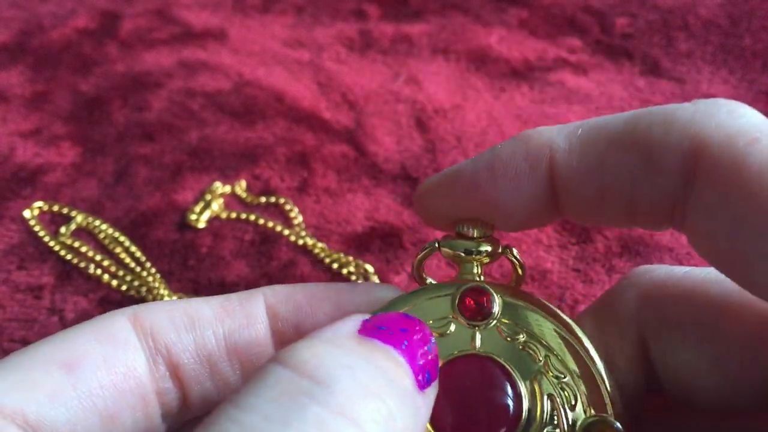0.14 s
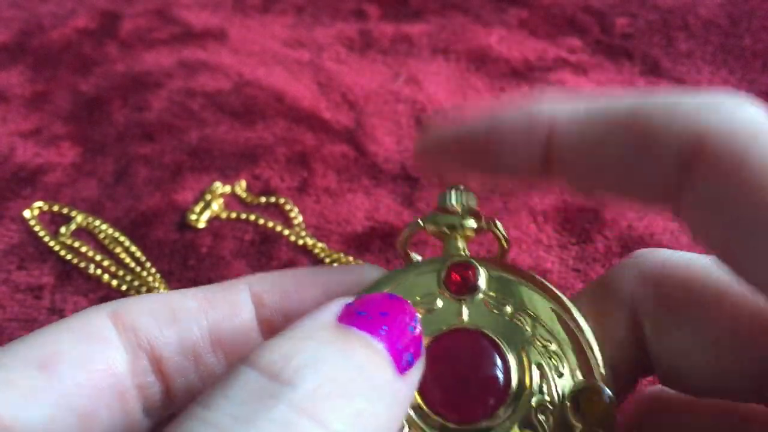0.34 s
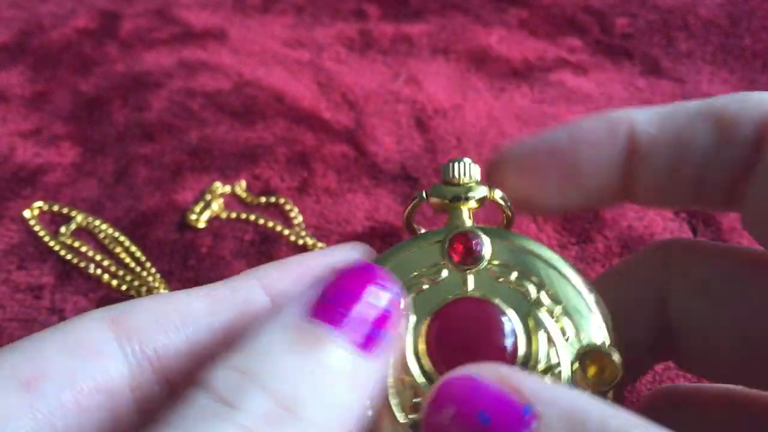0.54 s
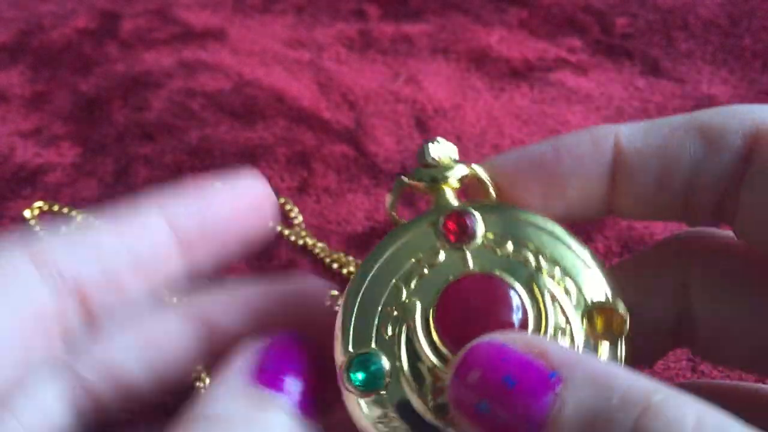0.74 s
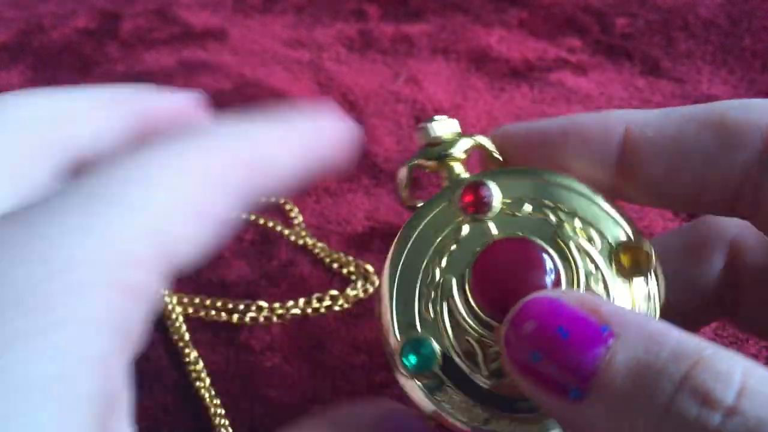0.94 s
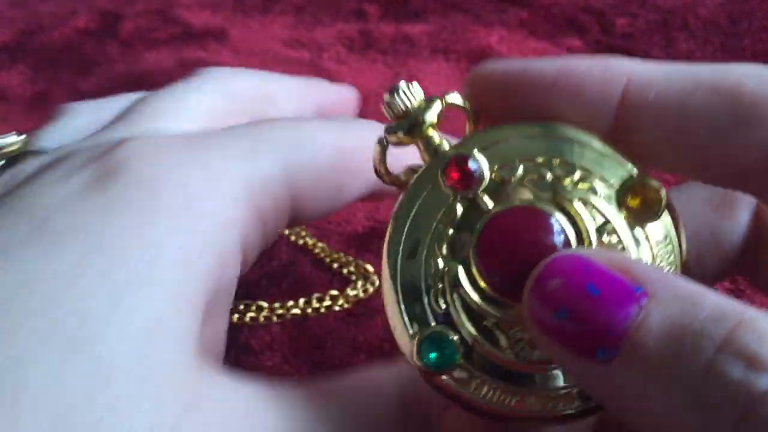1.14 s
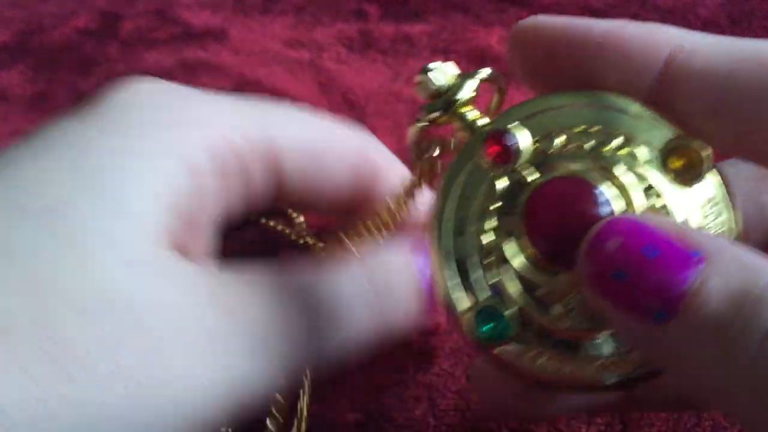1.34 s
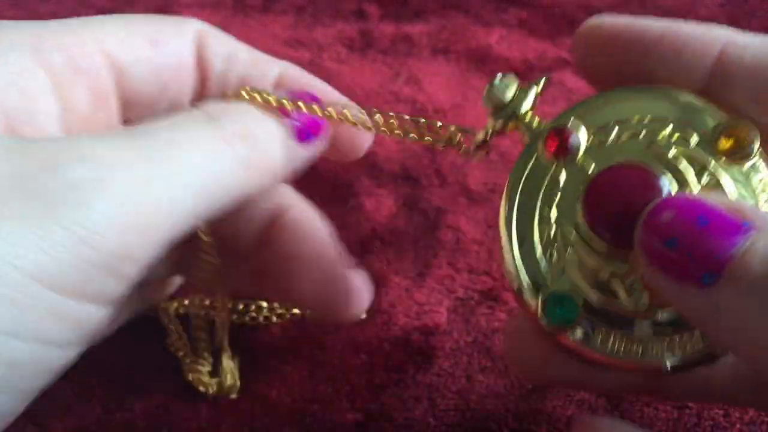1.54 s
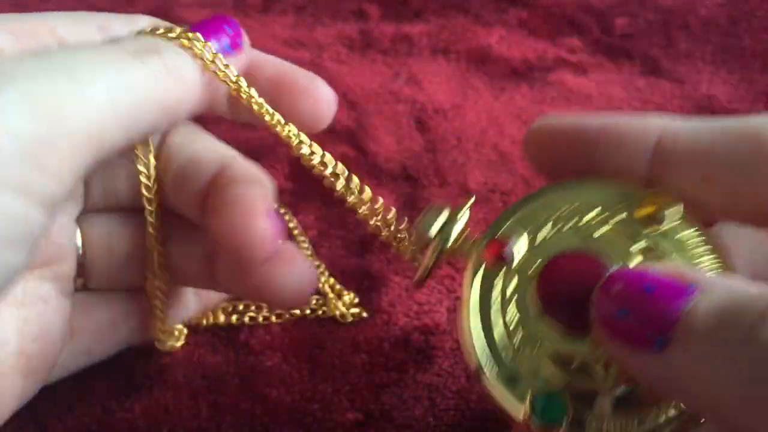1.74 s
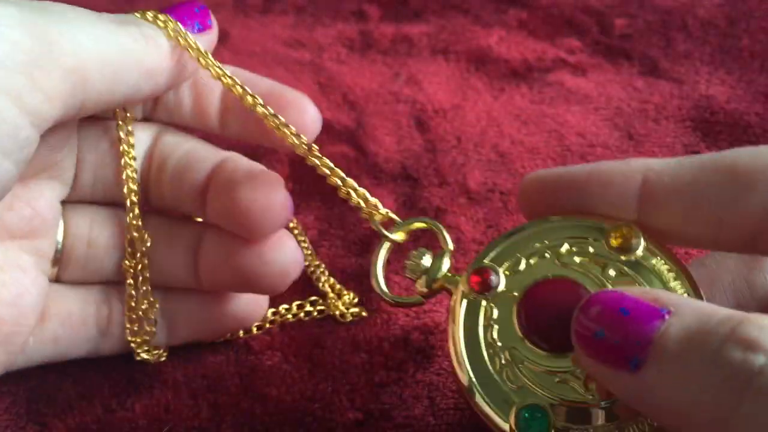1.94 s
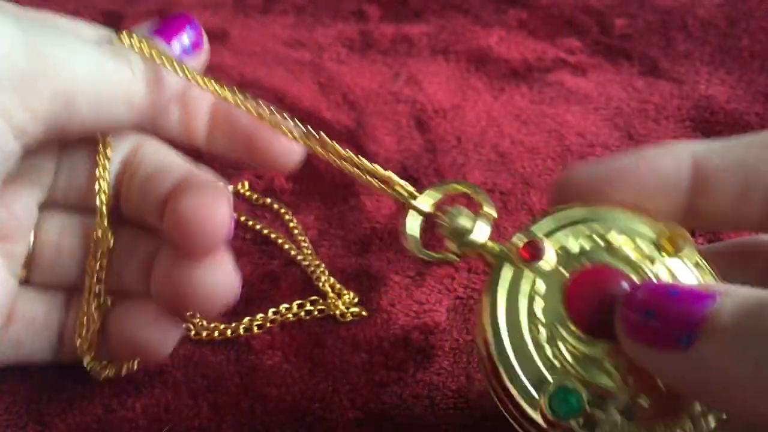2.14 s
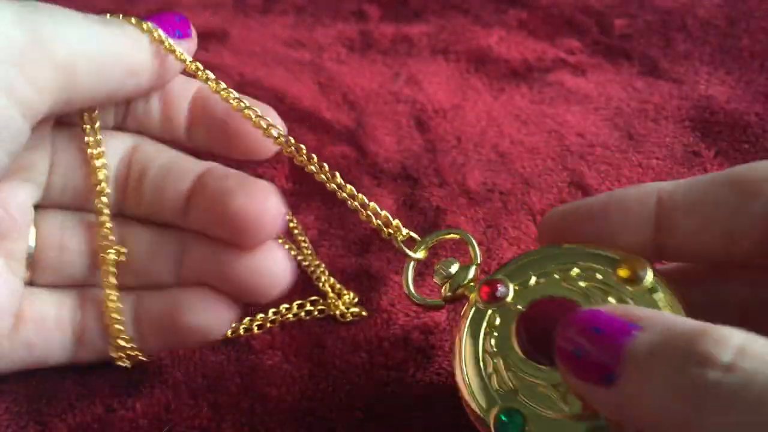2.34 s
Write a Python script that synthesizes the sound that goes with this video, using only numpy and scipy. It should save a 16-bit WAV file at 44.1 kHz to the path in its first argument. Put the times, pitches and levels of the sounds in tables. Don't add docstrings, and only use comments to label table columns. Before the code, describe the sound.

Pocket watch latch snaps sharply, then its metal bow clacks on the case amid faint chain ticks

```python
import sys
import numpy as np
from scipy import signal
from scipy.fft import rfft, irfft, next_fast_len
from scipy.io import wavfile
from scipy.ndimage import uniform_filter1d

SR = 44100
rng = np.random.default_rng(int(sys.argv[2]) if len(sys.argv) > 2 else 0)


def master(y):
    cut = np.clip(np.atleast_2d(y).T, -1, 1)
    pcm = np.round(cut * 32767)
    wavfile.write(sys.argv[1], SR, pcm.astype(np.int16))


def how_loud(loudness_db):
    steps = np.asarray(loudness_db, float) / 20
    return 10 ** steps


N = 105840


def unit(x):
    return x / np.sqrt(np.mean(x ** 2) + 1e-20)


def along(points, hz):
    f, value = np.transpose(points)
    return np.interp(np.log(hz + 1), np.log(f + 1), value)


def filtered(x, response):
    size = next_fast_len(N + 8192)
    spectrum = rfft(x, size) * response(np.fft.rfftfreq(size, 1 / SR))
    return irfft(spectrum, size)[:N]


def noise(response):
    return unit(filtered(rng.standard_normal(N), response))


def closed(points):
    return lambda hz: how_loud(along(points, hz)) * (hz >= points[0][0]) * (hz <= points[-1][0])


def cut(x, hz, kind):
    return signal.sosfilt(signal.butter(6, min(hz, SR / 2.1), kind, fs=SR, output="sos"), x)


def add(track, s, x):
    part = track[round(s * SR):][:len(x)]
    part += x[:len(part)]


def ring(modes, weight_db):
    rise_s, crack_db, crack_t60 = 0.00032, -7, 0.0039
    hz, db, t60 = np.transpose(modes)[:, :, None]
    t = np.arange(SR // 25) / SR
    envelopes = how_loud(db + np.reshape(weight_db, (-1, 1)) - 60 * t / t60)
    tones = envelopes * np.sin(2 * np.pi * hz * t)
    crack = how_loud(crack_db + np.mean(weight_db) - 60 * t / crack_t60) * rng.standard_normal(len(t))
    signs = (-1.) ** np.arange(len(modes))
    return (signs @ tones + crack) * (1 - np.exp(-t / rise_s))


def latch():
    # f/Hz, level/dB, t60/s
    latch_modes = [(647, -8.5, 0.0053), (915, -9.5, 0.0099), (1231, -19.5, 0.0094), (2010, -3, 0.011),
                   (2525, -18.5, 0.02), (3403, -3, .009), (4140, -0.5, 0.00713), (5550, 1, 0.0047),
                   (7220, 2.5, 0.0031), (8500, -6, 0.0043), (9800, -3, .0032), (11500, -24, .005),
                   (12950, -7.5, 0.0071), (14470, -6, .006),
                   (6515, -7, 0.003877), (13740, -11, .005), (15810, -32, .005)]
    # t/s, level/dB
    snaps = [
        (0.2126, -10.5),
        (0.235, -62.5),
    ]
    low_hz, top_hz = 309.4, 15234
    out = np.zeros(N)
    for s, db in snaps:
        add(out, s, how_loud(db) * ring(sorted(latch_modes), 0))
    out = cut(out, low_hz, "high")
    return cut(cut(out, top_hz, "low"), top_hz, "low")


def bow():
    # f/Hz, level/dB, t60/s
    case_modes = [(1295.3, -15, .007), (1842.7, -17, 0.016), (2395.5, -5, 0.01448), (2966, -23.5, 0.0069),
                  (4578, 0, 0.0076), (5120, -23.5, 0.02), (5400, -11.5, 0.012), (6920, -11.5, 0.0056),
                  (8010, -15, .005), (9100, -6, 0.0045), (11770, -3, 0.0047), (12900, -8, 0.0084),
                  (13500, -14.5, 0.0091), (15480, -18.5, 0.0087)]
    # t/s, level/dB, brightness/(dB per octave)
    contacts = [(.2170, -50, -7), (.2190, -50.5, 7), (0.22, -45.5, 2), (.6898, -49, 1), (.6939, -40, 4),
                (0.6953, -18.5, 3.5), (0.6964, -30, 3), (0.6972, -35, 1), (0.6987, -35, -0.5),
                (.7000, -50, 5), (.7016, -49, 3), (.7058, -40, 3), (.7064, -44, 1), (.7100, -57, 4),
                (.7133, -54, 6), (0.7161, -39, 2.5), (0.718, -53, 0.5), (0.7262, -58.5, 2),
                (0.7321, -62, -1)]
    scatter_db = 4
    out = np.zeros(N)
    octaves = np.log2(np.transpose(case_modes)[0] / 4500)
    for s, db, tilt_db in contacts:
        scatter = scatter_db * (db < -35) * rng.standard_normal(len(case_modes))
        add(out, s, how_loud(db) * ring(case_modes, tilt_db * octaves + scatter))
    return out


def touch(hz, others_db):
    # f/Hz, level/dB, t60/s
    loose_modes = [(1505, -7.5, .01), (2000, -3, .016), (2364, -3, 0.027), (3320, -6, .01),
                   (4420, -0.5, 0.018), (5120, -4, 0.022), (5480, -3.5, 0.015), (7000, -0.5, 0.0074),
                   (8600, -2.5, 0.019), (9650, -7, .01), (11770, -0.5, .014), (12900, 1, .014),
                   (14235, -5, .012), (15500, 0, 0.018)]
    favour_oct = 0.1
    damped_share, far_db_per_oct = 0.27, -3
    f, db, t60 = np.transpose(loose_modes)
    distance = np.abs(f - hz)
    f = np.where(distance == distance.min(), hz, f)
    octaves = np.abs(np.log2(f / hz))
    far = 1 - np.exp(-.5 * (octaves / favour_oct) ** 2)
    weight_db = others_db * far + far_db_per_oct * octaves + rng.normal(0, 1.608, len(f))
    return ring(np.transpose([f, db, t60 * damped_share ** far]), weight_db)


def ticks():
    # t/s, level/dB, favoured f/Hz, level of the other modes/dB
    link_hits = [(0.149, -67, 6100, -6), (.2005, -68, 12900, -9), (.2020, -56, 4630, -11),
                 (0.2075, -47, 4420, -26), (.2085, -56, 13300, -2), (0.219, -51, 15000, -4),
                 (.2200, -45, 10300, -4), (0.2206, -42, 14100, -12.5), (.2262, -50, 4000, 8),
                 (.2264, -65, 8750, -11.5), (0.232, -58, 8100, -10), (0.234, -55, 7000, -7.5),
                 (.2475, -58, 8500, -8), (0.3634, -53, 5520, -0.5), (0.3633, -58, 4015, -2.5),
                 (0.4656, -57, 2265, -13), (0.4773, -64, 2700, -11), (0.716, -47, 13700, -9.5),
                 (0.7183, -48, 5140, -16), (1.134, -64, 15300, -4), (1.1369, -59.5, 5120, -10),
                 (1.1372, -58, 12900, -3), (1.1364, -57.5, 11500, -1.5), (1.1498, -58, 12900, -3),
                 (1.1497, -66.5, 5120, -12), (1.245, -55, 4420, -14), (1.2451, -60.5, 2000, -2),
                 (1.502, -65, 7000, -5), (1.8328, -62.5, 15500, -5.5), (1.8353, -59.5, 11770, -5.5),
                 (1.8510, -63, 4420, -30.5), (1.902, -56, 7000, -6), (1.9025, -65, 15500, -6),
                 (1.912, -55, 4400, -17), (1.912, -60.5, 7000, -20), (1.9450, -72, 4420, -24),
                 (1.9632, -58, 7000, -9), (1.9628, -60, 12430, 0), (1.963, -65, 8440, -7),
                 (2.0880, -65, 13600, -9), (2.097, -58.5, 15500, -8.5), (2.0994, -55.5, 4420, -5),
                 (2.0995, -53.5, 12900, -3.5), (2.1005, -57.5, 2000, -4.5), (2.131, -66, 15500, -5)]
    chatter_s, chatter_db = 0.002, -20.5
    out = np.zeros(N)
    t = np.arange(SR // 100) / SR
    for s, db, hz, others_db in link_hits:
        chatter = how_loud(chatter_db) * rng.standard_normal(len(t)) * np.exp(-t / chatter_s)
        tick = np.convolve(np.r_[1, chatter], touch(hz, others_db))
        add(out, s, how_loud(db) * tick / np.abs(tick).max())
    return out


def scrapes():
    # t/s, length/s, level/dB, favoured f/Hz, level of the other modes/dB
    rubs = [(.128, .035, -75, 5120, -8), (.188, 0.021, -65, 2365, -6), (.226, .05, -67, 2030, -12),
            (.232, .08, -70, 8400, -1), (0.671, .02, -75, 7000, -2), (.72, 0.03, -71, 5150, -10),
            (.725, .03, -74, 2390, -10), (0.799, 0.1, -79, 2420, -16), (1.124, 0.03, -75, 13000, -2),
            (1.125, 0.036, -76, 5120, -20), (1.128, .03, -80, 9000, 0), (1.232, 0.028, -80, 4420, -18),
            (1.53, 0.06, -83, 4420, -18), (1.54, .06, -84, 1950, -14), (1.625, .035, -84, 4420, -18),
            (1.81, 0.06, -83, 4420, -18), (1.83, .012, -77, 14500, -2), (1.885, 0.056, -78, 2380, -16),
            (1.905, 0.035, -78, 5170, -20), (1.908, .02, -78, 7100, -12), (1.91, .045, -80, 4420, -18),
            (1.958, .014, -78, 9000, 0), (1.96, .028, -82, 4420, -18), (1.974, 0.02, -80, 2400, -14),
            (2.092, .014, -75, 14000, -1), (2.13, 0.03, -81, 15000, -5), (2.137, .035, -83, 5150, -16)]
    out = np.zeros(N)
    for s, length, db, hz, others_db in rubs:
        count = round(length * SR)
        grains = rng.standard_normal(count) * how_loud(3.45 * rng.exponential(size=count))
        drive = unit(grains) * np.hanning(count) ** .5
        rub = signal.fftconvolve(drive, touch(hz, others_db))
        add(out, s, how_loud(db) * rub / np.sqrt(np.mean(rub[:count] ** 2)))
    return out


def blurred(x):
    bins, share = 19, .93
    z = signal.stft(x, nperseg=256)[2]
    power = np.abs(z) ** 2
    spread = (1 - share) * power + share * np.abs(uniform_filter1d(power, size=bins, axis=0))
    y = signal.istft(z * np.sqrt(spread / (power + 1e-20)), nperseg=256)[1][:N]
    return y * np.linalg.norm(x) / np.linalg.norm(y)


def room(x):
    # f/Hz, t60/s
    decay = [(400, .22), (2000, 0.5), (8000, 0.42), (15000, 0.51)]
    # f/Hz, level/dB
    colour = [(700, 2.5), (1500, -6), (2100, -2.5), (4000, -7.5), (7500, -0.5), (11000, -2), (16000, -2.5)]
    level_db, gap_s = -32.5, .02
    hz, t, z = signal.stft(rng.standard_normal(SR // 2), SR, nperseg=256)
    decay_db = along(colour, hz)[:, None] - 60 * t / along(decay, hz)[:, None]
    tail = signal.istft(z * how_loud(decay_db), SR, nperseg=256)[1]
    tail *= 1 - np.exp(-(np.arange(len(tail)) / SR / gap_s) ** 2)
    return how_loud(level_db) * signal.fftconvolve(x, tail / np.linalg.norm(tail))[:N]


def motor():
    # t/s, f/Hz, level/dB
    course = [(0, 116.8, -64.5), (0.099, 118.4, -48), (0.239, 117.9, -64.5), (0.339, 117.4, -50),
              (0.499, 117.1, -48.5), (.62, 118.3, -60), (.72, 117.9, -52), (.95, 118.3, -52.5),
              (1.061, 119.4, -61.5), (1.239, 117.7, -51), (1.43, 117.6, -60), (1.619, 117.4, -53),
              (1.759, 116.4, -57), (1.98, 115.4, -54), (2.1, 117.6, -58), (2.4, 118.9, -55.5)]
    s, hz, db = np.transpose(course)
    t = np.arange(N) / SR
    phase = 2 * np.pi * np.cumsum(np.interp(t, s, hz)) / SR
    return np.sqrt(2) * how_loud(np.interp(t, s, db)) * np.sin(phase)


def hum():
    # f/Hz, wander width/Hz, level/dB
    bands = [(53.3, 5.6, -55.5), (80, 8, -60), (104.04, 3.8, -65), (177.4, 45.7, -60), (240, 11, -68),
             (356.6, 19, -79.5)]
    out = np.zeros(N)
    for hz, width, db in bands:
        out += how_loud(db) * noise(lambda f: np.exp(-2 * ((f - hz) / width) ** 2))
    return out


def air():
    # f/Hz, level/(dB per Hz)
    rumble = [(20, -33.5), (40, -14.5), (55, -1), (120, -4.5), (230, -8), (312, -22), (420, -31),
              (600, -40)]
    # f/Hz, level/(dB per Hz)
    hiss = [(250, -6.5), (500, 2), (1100, -0.5), (2200, 0.5), (5000, -6), (11600, -10.5), (15750, -12.5),
            (16050, -29.5)]
    return how_loud(-55) * noise(closed(rumble)) + how_loud(-74) * noise(closed(hiss))


def scene():
    case_low_hz, case_top_hz = 1030, 15350
    latch_send_db, case_send_db, case_send_tilt_db = -1.5, 2.5, -0.5
    snap = latch()
    case = cut(bow() + ticks() + scrapes(), case_low_hz, "high")
    case = cut(case, case_top_hz, "low")
    snap_send = how_loud(latch_send_db) * blurred(snap)
    case_send = filtered(blurred(case),
                         lambda f: how_loud(case_send_db + case_send_tilt_db * np.log2(f / 5000 + .1)))
    direct = snap + case
    background = motor() + hum() + air()
    return (direct + room(snap_send) + room(case_send) + background)[None]


def top_cut(x):
    return signal.sosfilt(signal.butter(12, 16750, fs=SR, output="sos"), x)


def record(dry):
    port_hz, port_width_hz, port_db = 10500, 410, -4
    edge_hz, edge_width_hz = 15770, 380

    def response(f):
        port = 1 - (1 - how_loud(port_db)) * np.exp(-((f - port_hz) / port_width_hz) ** 2)
        edge = np.exp(-(np.maximum(f - edge_hz, 0) / edge_width_hz) ** 2)
        return port * edge

    return top_cut(filtered(dry[0], response)[None])


dry = scene()
out = record(dry)
master(out)
```